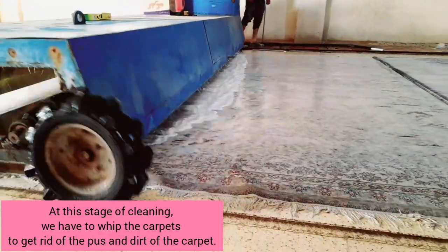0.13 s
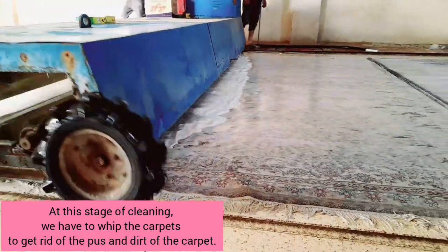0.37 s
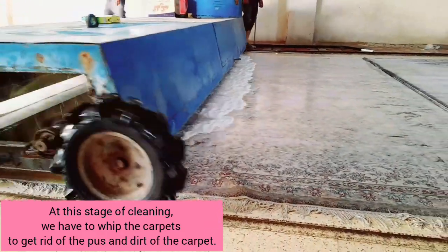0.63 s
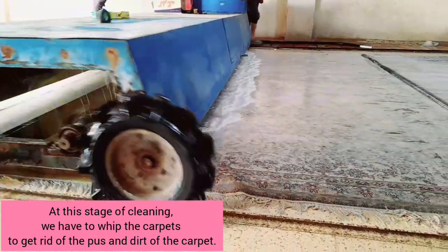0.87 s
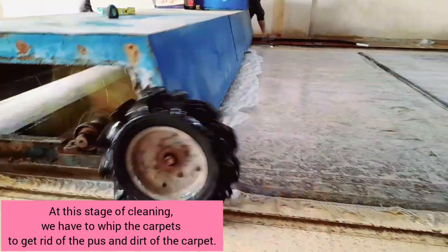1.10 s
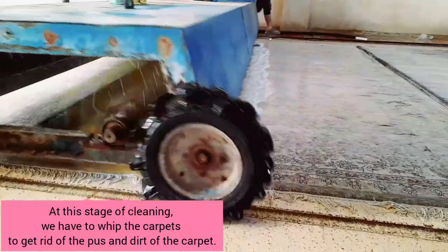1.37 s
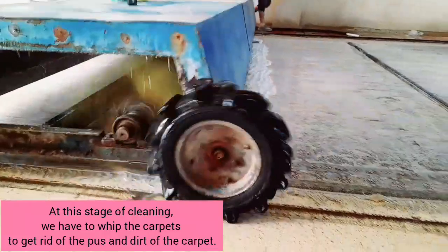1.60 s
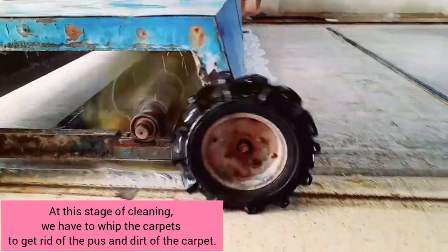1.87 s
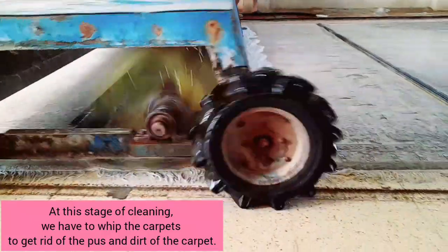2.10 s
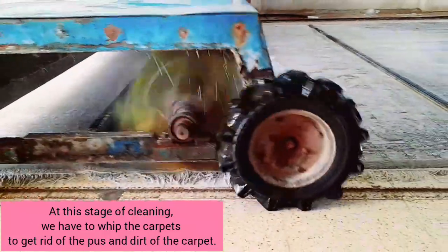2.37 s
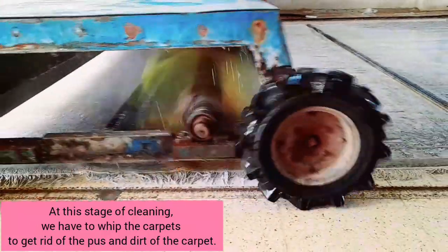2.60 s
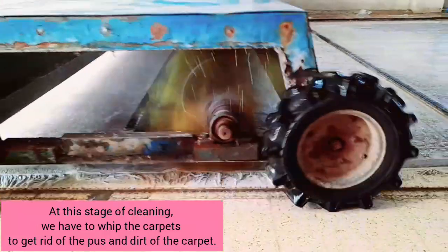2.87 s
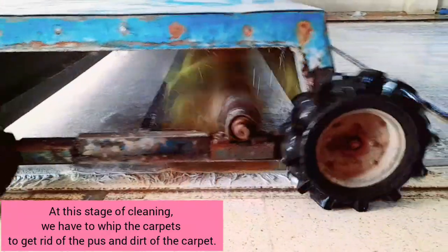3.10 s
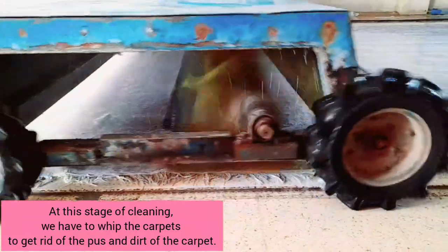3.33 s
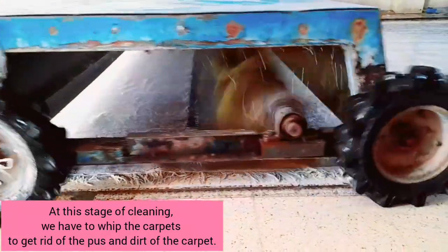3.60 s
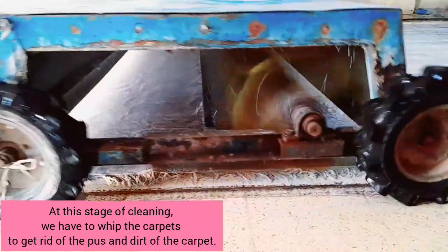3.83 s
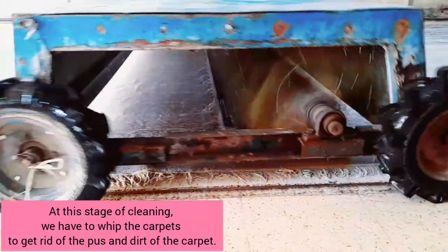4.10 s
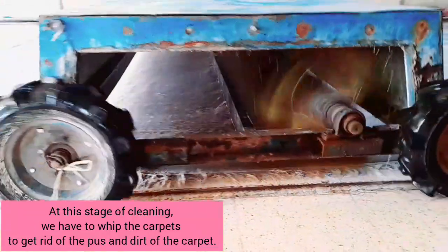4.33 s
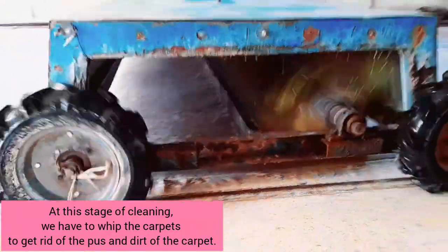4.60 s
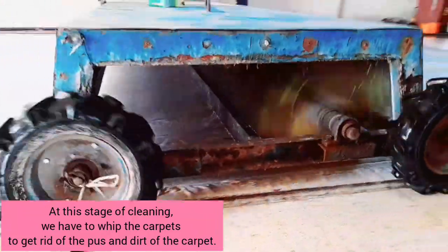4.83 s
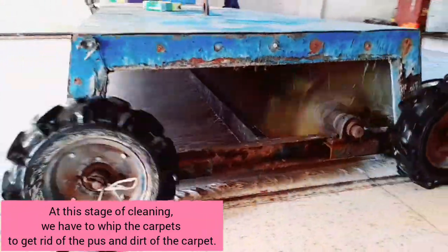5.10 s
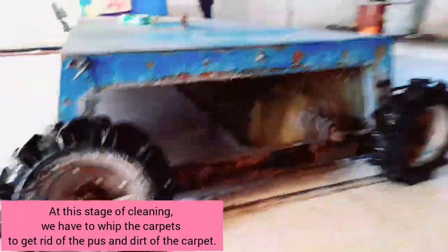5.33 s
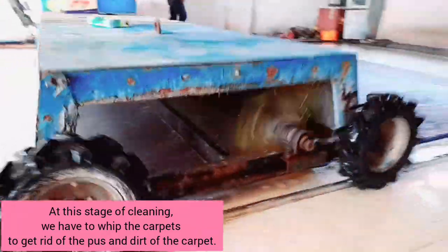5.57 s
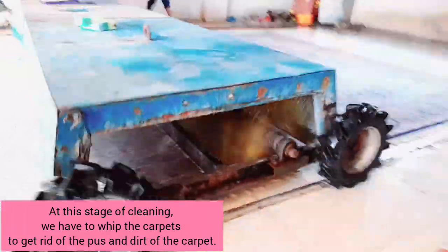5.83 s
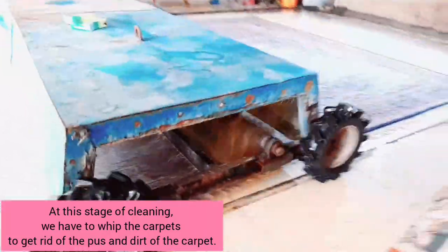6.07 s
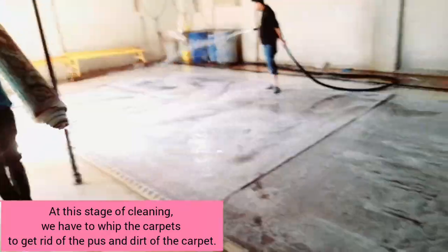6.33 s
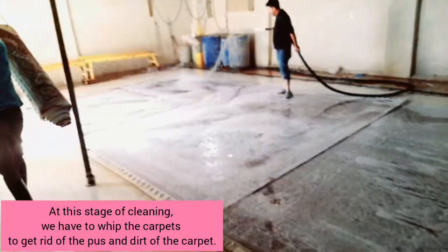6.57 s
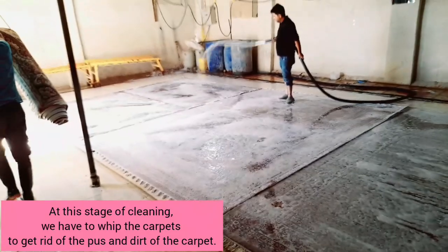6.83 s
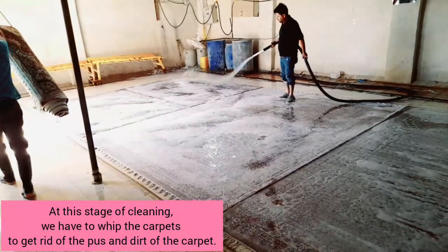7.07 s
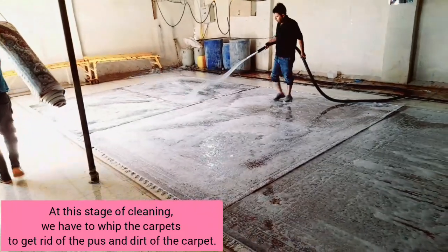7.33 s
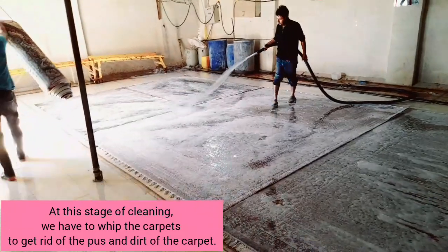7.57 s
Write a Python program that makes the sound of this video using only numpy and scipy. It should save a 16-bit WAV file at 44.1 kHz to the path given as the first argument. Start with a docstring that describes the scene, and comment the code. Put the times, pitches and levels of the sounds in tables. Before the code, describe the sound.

A dense, fluttering roar of straps on soaked carpet swells as the machine passes nearby, low boom below and spitting treble spray above. A constant mid-pitched motor tone drifts between left and right in the reverberant hall. At about 6.3 seconds the view changes abruptly: no beater, only the whining motor, a buzzing pump pulse, low rumble and clearer water spray with thin nozzle whistles.

```python
"""In a hard-walled workshop a carpet beating machine rolls past a phone held low: straps thud and swish on wet pile.
Elsewhere in the hall a motor whines, a piston pump throbs and a hose sprays. At 6.317 s the listening place changes:
away from the beater, only motor, pump and spray remain. Wavering sines make the motor and pump;
coloured noise with scattered knocks makes the beating, rumble and spray; narrow noise bands make the whistles."""
import sys
import numpy as np
from scipy import signal
from scipy.fft import rfft, irfft
from scipy.io import wavfile
from scipy.ndimage import uniform_filter1d

SR = 44100
rng = np.random.default_rng(int(sys.argv[2]) if len(sys.argv) > 2 else 0)


def convert_level_to_amplitude(level_db):
    """Map a level in decibels to its linear amplitude factor."""
    exponent = np.asarray(level_db, float) / 20
    return 10 ** exponent


def unload_wav(signal):
    """Save mono or channel-first audio to the path in sys.argv[1] as 16-bit WAV at rate SR, clipped to [-1, 1]."""
    wavfile.write(
        sys.argv[1],
        SR,
        np.round(np.clip(np.atleast_2d(signal).T, -1, 1) * 32767).astype(np.int16),
    )


N = 339129
T = np.arange(N) / SR  # s
F = np.arange(N // 2 + 1) * SR / N  # Hz
CHANGE_S = 6.317  # near the beater before, away from it after


def level(x, db):
    """Normalisation: scale a signal to an rms level in dB."""
    return x * convert_level_to_amplitude(db) / np.sqrt(np.mean(x ** 2))


def curves(table):
    """Linear interpolation in time: each column becomes one value a sample."""
    s, *columns = np.transpose(table)
    return [np.interp(T, s, column) for column in columns]


def over_hz(table, hz):
    """Interpolation over log frequency: columns of a spectrum table at the given frequencies."""
    table_hz, *columns = np.transpose(table)
    return [np.interp(np.log(hz + 1), np.log(table_hz), column) for column in columns]


def walk(rate):
    """Slow random modulation: values held 1 / rate s and smoothed twice; spread near 1."""
    hold = int(SR / rate)
    held = np.repeat(rng.standard_normal(N // hold + 1), hold)
    smooth = uniform_filter1d(uniform_filter1d(held, hold), hold)
    return 1.3 * smooth[:N]


def grains(rate, spread_db):
    """Random impulse process: scattered knocks of uneven but bounded size; rms 1."""
    struck = rng.random(N) < rate / SR
    size = np.minimum(rng.exponential(size=N), 3)
    x = struck * convert_level_to_amplitude(spread_db * size)
    return level(x - x.mean(), 0)


def wash(drive, colour, ports, flicker_db, flicker_rate):
    """Diffuse stereo field: a coloured drive plus unrelated side noise, flickering by octave; mid rms 1."""
    gain = convert_level_to_amplitude(over_hz(colour, F)[0])
    side_db, pan_db = over_hz(ports, F)
    mid = rfft(drive) * gain
    side = rfft(rng.standard_normal(N)) * gain * convert_level_to_amplitude(side_db)
    pair = np.array([(mid + side) * convert_level_to_amplitude(pan_db / 2), (mid - side) * convert_level_to_amplitude(-pan_db / 2)])
    out = 0
    lowest, highest = np.log2(colour[0][0]), np.log2(colour[-1][0])
    for octave in np.arange(np.floor(lowest), highest + 1):
        # overlapping raised-cosine bands
        band = np.cos(np.pi / 2 * np.clip(np.log2(F + 1) - octave, -1, 1)) ** 2
        out = out + irfft(pair * band, N) * convert_level_to_amplitude(flicker_db * walk(flicker_rate))
    return out / np.sqrt(np.mean(out.mean(axis=0) ** 2))


def tone(hz, left_db, right_db, lead, waver_db):
    """Sinusoid in a sound field: level and phase differ between two ports; levels are rms before the waver."""
    phase = 2 * np.pi * (np.cumsum(hz + 0 * T) / SR + rng.random())
    # the second place lands on another moment of the cycle
    phase = phase + 1.3 * np.clip((T - CHANGE_S) / .006, 0, 1)
    gain = np.sqrt(2) * convert_level_to_amplitude(waver_db * walk(12))
    return gain * np.array([convert_level_to_amplitude(left_db) * np.sin(phase + lead), convert_level_to_amplitude(right_db) * np.sin(phase)])


def peaks(table, scale):
    """Superposition of bell-shaped resonance curves."""
    return sum(scale(db, width) / (1 + (2 * (F - hz) / width) ** 2) for hz, width, db in table)


def passing(db, nearest_s, span_s, surge_db=0):
    """Distance law of a part rolling past: loudest when nearest, 3 dB down span_s away in time."""
    return convert_level_to_amplitude(db + surge_db) / np.sqrt(1 + ((T - nearest_s) / span_s) ** 2)


# Thud spectrum. Each row: frequency in Hz, relative density in dB per Hz.
THUD_SPECTRUM = [(30, -41), (55, -9), (100, -6), (175, -4), (270, -4), (330, -6), (380, -18), (600, -19),
                 (900, -50)]
# Cavity and panel resonances of the beater's housing. Each row: frequency in Hz, width in Hz,
# rise over the thud in dB.
HOUSING_RESONANCES = [(85, 15, 2), (140, 24, 7), (215, 20, 5), (252, 28, 7)]
# The two microphone ports near the beater, used by all its parts. Each row: frequency in Hz,
# side minus mid in dB, left minus right in dB.
NEAR_PORTS = [(60, -35, -0.5), (200, -24, -0.5), (400, -11, -2), (704, -7.5, -2.5), (1310, 0, 2.5),
              (2420, -0.5, -4), (4430, 1.5, 0), (8040, -0.5, 0), (14900, -12, -16.5)]


def thud(surge_db):
    """Resonance: noise and knocks on the carpet excite the cavities and panels of the housing."""
    housing = convert_level_to_amplitude(peaks(HOUSING_RESONANCES, lambda db, width: db))
    strikes = rng.standard_normal(N) - 0.54 * grains(400, 1.1)
    knocks = irfft(rfft(strikes) * housing, N)
    boom = wash(knocks, THUD_SPECTRUM, NEAR_PORTS, flicker_db=0.35, flicker_rate=9)
    return boom * passing(-17, 4, 3.26, surge_db)


# Rattle spectrum. Each row: frequency in Hz, relative density in dB per Hz.
RATTLE_SPECTRUM = [(250, -14), (400, 0), (650, 2.5), (930, -3.5), (1050, -17), (1500, -27.5)]


def rattle(surge_db):
    """Noise shaping: a mid-pitched clatter is random noise with a coloured spectrum."""
    clatter = wash(rng.standard_normal(N), RATTLE_SPECTRUM, NEAR_PORTS, flicker_db=1.0, flicker_rate=14)
    return clatter * passing(-27, 3.46, 3.4, surge_db)


# Slap spectrum. Each row: frequency in Hz, relative density in dB per Hz.
SLAP_SPECTRUM = [(700, -24), (1000, -3.5), (1220, -0.5), (1500, -5), (2500, -6.5), (3500, -6.5),
                 (5000, -12), (7000, -21.5)]


def slap(beat, surge_db):
    """Amplitude modulation: noise and fine impacts rise with each strap pass, weighted to the right."""
    drive = rng.standard_normal(N) + 0.38 * grains(2000, 4.0)
    smack = wash(drive, SLAP_SPECTRUM, NEAR_PORTS, flicker_db=0.47, flicker_rate=10)
    smack = smack * level(1 + 0.46 * beat, 0)
    pan = convert_level_to_amplitude(np.array([[-1], [1]]))  # left 2 dB below right
    return pan * smack * passing(-31.5, 4.1, 3.06, surge_db)


# Swish spectrum. Each row: frequency in Hz, relative density in dB per Hz.
SWISH_SPECTRUM = [(3500, -10), (5500, 1), (7400, -2), (8500, -5), (10000, 2.5), (12000, -4), (14500, 0),
                  (16000, -5)]


def swish(beat):
    """Amplitude modulation: droplets thrown by each pass are treble noise and fine impacts in bursts."""
    drive = rng.standard_normal(N) + 0.19 * grains(4000, 2.2)
    droplets = wash(drive, SWISH_SPECTRUM, NEAR_PORTS, flicker_db=2.4, flicker_rate=11)
    return droplets * level(1 + 0.96 * beat, 0) * passing(-31.5, 2.76, 1.9)


# Strap passes. Each row: time in seconds, passes per second.
STRAP_PASSES = [(0, 24.55), (1.4, 24.2), (2.6, 24.4), (3.9, 24.4), (4.35, 25.0), (4.8, 24.45), (5.5, 24.4),
                (5.8, 23.6)]


def strap_beat():
    """Periodic envelope: a row of straps lands over a short while, then the spray thins."""
    turn = (np.cumsum(curves(STRAP_PASSES)[0]) / SR + .17) % 1  # fraction of a pass
    force = convert_level_to_amplitude(1.5 * walk(24))
    return force * (turn / .2) ** 2 * np.exp(2 - 2 * turn / .2)


# Brief swells and dips of the beating. Each row: centre in seconds, length in seconds, thud change in dB,
# rattle change in dB, slap change in dB.
BEATING_SURGES = [(.4, 0.5, 1.5, 2.5, -0.5), (1.752, 0.24, 1.5, 1, 1), (2.9, 0.63, 0.5, 1, 2),
                  (4.25, 0.61, 2.5, 1.5, -0.5), (5.35, 0.45, 2, 2, 2.5), (6.0, .4, -2, 2.5, -1)]


def beater(near):
    """Superposition: straps knock the wet carpet all along the shaft; each pass throws a swish of droplets."""
    surge_db = np.zeros((3, N))
    for centre, length, *change_db in BEATING_SURGES:
        surge_db += np.exp(-(2 * (T - centre) / length) ** 2) * np.array(change_db)[:, None]
    thud_db, rattle_db, slap_db = surge_db
    beat = strap_beat()
    return near * (thud(thud_db) + rattle(rattle_db) + slap(beat, slap_db) + swish(beat))


# The hand-held phone drifts through the whine's standing waves. Each row: time in seconds,
# mean level of the two ports in dB, left minus right in dB.
WHINE_DRIFT = [(0, -12, 1.5), (.3, -13.5, 3), (.5, -11.5, 2), (.83, -13, 5), (1.08, -10.5, 6),
               (1.29, -18, 1), (1.45, -16, -3), (1.62, -18.5, -4), (1.9, -14, -2), (2.25, -17.5, -0.5),
               (2.5, -12.5, -3.5), (2.68, -18.5, -2.5), (3.08, -12, -2.5), (3.38, -17.5, -10),
               (3.55, -17, -4), (3.8, -15.5, -4), (3.93, -12.5, 0), (4.22, -12, 1.5), (4.36, -15.5, -5),
               (4.48, -14, -9), (4.74, -15.5, -1), (4.94, -15, -8), (5.36, -9, -1), (5.54, -12.5, -3),
               (5.7, -12, -3), (5.92, -18, -17), (6.02, -21.5, -6), (6.29, -11.5, -3.5), (6.34, -16.5, 2),
               (6.6, -17.5, 8), (7.2, -17, 6.5), (7.38, -21, 4), (7.69, -16, 15)]
# Phase of the whine in the second place, where the phone turns. Each row: time in seconds,
# lead of the left port in radians.
WHINE_FAR_LEAD = [(7.3, 0.36), (7.48, 3.1), (7.69, 1.1)]


def whine(near):
    """Standing waves: a steady motor tone varies in level and phase as the phone drifts through them."""
    level_db, pan_db = curves(WHINE_DRIFT)
    left_db = level_db - 10 * np.log10((1 + convert_level_to_amplitude(-2 * pan_db)) / 2)
    # near the beater, the weaker the left port (below -12.5 dB), the more it leads, up to 1.26 rad
    near_lead = np.clip(0.63 * (-12.5 - left_db), 0, 1.26)
    lead = np.where(near, near_lead, curves(WHINE_FAR_LEAD)[0])
    hz = np.where(near, 506.35, 506.8)
    return tone(hz, left_db, left_db - pan_db, uniform_filter1d(lead, size=400), waver_db=0.93)


# Second motor tone. Each row: time in seconds, left level in dB, right level in dB,
# lead of the left port in radians.
UNDERTONE_DRIFT = [(0, -23.5, -31, 1.7), (1.2, -27, -24, 1.8), (1.6, -32, -31, 2.1), (2.5, -31, -26, 2.2),
                   (2.7, -34, -31, 2.6), (2.9, -36, -28, 1.4), (3.4, -38, -23, 1.2), (3.9, -35, -29, 5),
                   (5.0, -30, -27, 1.8), (5.6, -33, -36, .8), (6.3, -23, -23, .9), (6.4, -27, -17, .9),
                   (7.15, -26, -24.5, 2), (7.69, -24.5, -20, 1.4)]


def undertone(near):
    """Interaural-style differences: a second, lower motor tone shifts in level and phase at the ports."""
    return tone(np.where(near, 416.8, 417.2), *curves(UNDERTONE_DRIFT), waver_db=.7)


# Weaker motor tones. Each row: frequency in Hz, level near the beater in dB, level away from it in dB,
# lead of the left port in radians.
WEAK_MOTOR_TONES = [(327.4, -34, -30, .8), (390.0, -43, -35, .8), (687, -50, -46, .5), (783, -50, -45, .5),
                    (838, -50, -47, .5)]


def motor(near):
    """Line spectrum: the main whine and its neighbours add as separate sines."""
    out = whine(near) + undertone(near)
    for hz, near_db, far_db, lead in WEAK_MOTOR_TONES:
        db = np.where(near, near_db, far_db)
        out = out + tone(hz, db, db, lead, waver_db=.8)
    return out


# Pump harmonics that stand out near the beater, before screening. Each row: multiple of the stroke rate,
# left level in dB, right level in dB, lead of the left port in radians.
PUMP_HARMONICS_NEAR = [(5, -36, -36, 2.0), (7, -28.5, -32.5, .6), (8, -35, -36, .2), (11, -33, -34, .3)]
# Pump harmonics away from the beater. Each row: multiple of the stroke rate, left level in dB,
# right level in dB, lead of the left port in radians.
PUMP_HARMONICS_FAR = [(2, -47, -47, 0), (3, -49, -51, -0.5), (4, -38, -43.5, -0.3), (5, -48, -42, -2.1),
                      (6, -35, -37, -0.4), (7, -29.5, -39.5, 0.4), (8, -35, -36, 0), (9, -34.5, -34, -1),
                      (10, -35, -34, -0.5), (11, -30, -29, -0.5), (13, -45, -38, -1), (14, -52, -44, 2),
                      (15, -32.5, -42, 1.1)]
# The beater rolls between pump and phone and screens it. Each row: time in seconds, gain in dB.
SCREENING = [(.8, 2), (1.2, -3)]


def pump(near):
    """Fourier series: even strokes give a harmonic stack, coloured anew by each spot in the hall."""
    near_rate, far_rate = 26.97, 27.03  # strokes per second
    close = sum(tone(k * near_rate, *row, waver_db=3.0) for k, *row in PUMP_HARMONICS_NEAR)
    far = sum(tone(k * far_rate, *row, waver_db=.8) for k, *row in PUMP_HARMONICS_FAR)
    return np.where(near, close * convert_level_to_amplitude(curves(SCREENING)[0]), far)


# Narrow whistles of the spray nozzle. Each row: frequency in Hz, width in Hz,
# mid level in dB before the gain of the listening place.
NOZZLE_WHISTLES = [(2836, 15, -55), (3951, 25, -49), (4581, 20, -54), (5221, 25, -53), (5728, 30, -52),
                   (6382, 45, -52), (7812, 25, -58), (9008, 35, -53), (9124, 50, -52), (9688, 25, -52),
                   (10260, 50, -50), (11043, 40, -56), (11434, 60, -61), (12823, 40, -61), (13235, 60, -58),
                   (14605, 35, -53), (14772, 40, -61), (15150, 80, -60)]


def whistles(near):
    """Narrow-band noise: thin resonant bands from the nozzle, partly alike at the two ports."""
    # narrower bands need more gain for the same rms
    shape = peaks(NOZZLE_WHISTLES, lambda db, width: convert_level_to_amplitude(db) * np.sqrt(2 * SR / (np.pi * width)))
    mid, side = irfft(rfft(rng.standard_normal((2, N))) * shape, N)
    place_db = np.where(near, 2.0, 4.5)
    return (mid + .5 * side * np.array([[1], [-1]])) * convert_level_to_amplitude(place_db)


# Hall rumble spectrum. Each row: frequency in Hz, relative density in dB per Hz.
RUMBLE_SPECTRUM = [(30, -44), (55, -32), (90, -35), (130, -13), (240, -14.5), (310, -5.5), (365, -9),
                   (400, -16), (440, -13.5), (560, -16.5), (700, -18.5), (1040, -19), (1150, -27.5),
                   (2500, -32.5), (4000, -64)]
# Hose spray spectrum. Each row: frequency in Hz, relative density in dB per Hz.
SPRAY_SPECTRUM = [(1200, -19.5), (2200, -7.5), (3400, -8.5), (4500, 2.5), (5100, -6), (6000, -12.5),
                  (8000, -13), (10000, -16), (12000, -16.5), (15500, -18.5)]
# The two microphone ports for the hall sounds. Each row: frequency in Hz, side minus mid in dB,
# left minus right in dB.
FAR_PORTS = [(60, -23, 7), (200, -26, -8.5), (400, -9, -2.5), (700, -5.5, -1), (1310, 2.5, -3),
             (2400, 0.5, -7.5), (4400, 1, -2.5), (8000, 0.5, 1), (15000, -1, 6)]
# Levels of the hall sounds. Each row: time in seconds, rumble level in dB, spray level in dB.
RUMBLE_SPRAY_LEVELS = [(0, -27.5, -33), (3, -25, -33.5), (6.3, -25.5, -34.5), (6.33, -28.5, -32.5),
                       (7, -27.5, -31.5), (7.69, -27, -29.5)]


def hall():
    """Diffuse field: machine rumble fills the room beside the hiss of the hose on wet carpet."""
    rumble_db, spray_db = curves(RUMBLE_SPRAY_LEVELS)
    rumble = wash(rng.standard_normal(N), RUMBLE_SPECTRUM, FAR_PORTS, flicker_db=0.72, flicker_rate=6)
    drops = rng.standard_normal(N) + 0.32 * grains(4000, 2.7)
    spray = wash(drops, SPRAY_SPECTRUM, FAR_PORTS, flicker_db=0.51, flicker_rate=7)
    return rumble * convert_level_to_amplitude(rumble_db) + spray * convert_level_to_amplitude(spray_db)


def scene():
    """Superposition: everything but the beater sounds on in the second place."""
    near = T < CHANGE_S
    return beater(near) + motor(near) + pump(near) + whistles(near) + hall()


def roll_off(x):
    """The treble ends steeply here."""
    return signal.sosfilt(signal.butter(12, 15750, fs=SR, output="sos"), x)


def record(dry):
    """Soft saturation: the phone rounds the loudest peaks a little."""
    rounded = np.tanh(.6 * dry) / .6
    return roll_off(rounded)


dry = scene()
out = record(dry)
unload_wav(out)
```